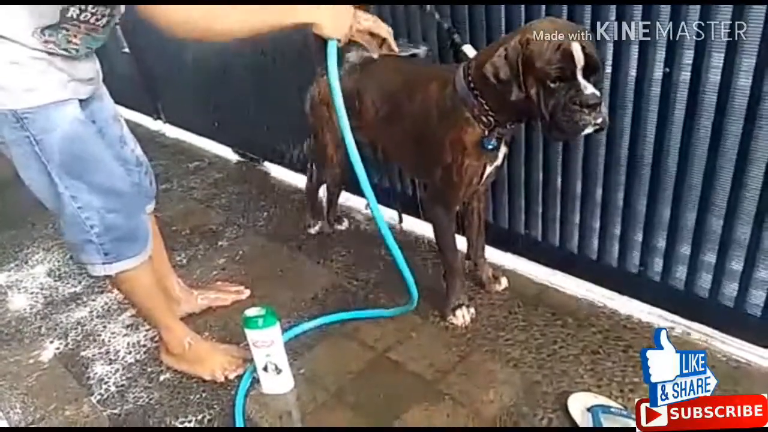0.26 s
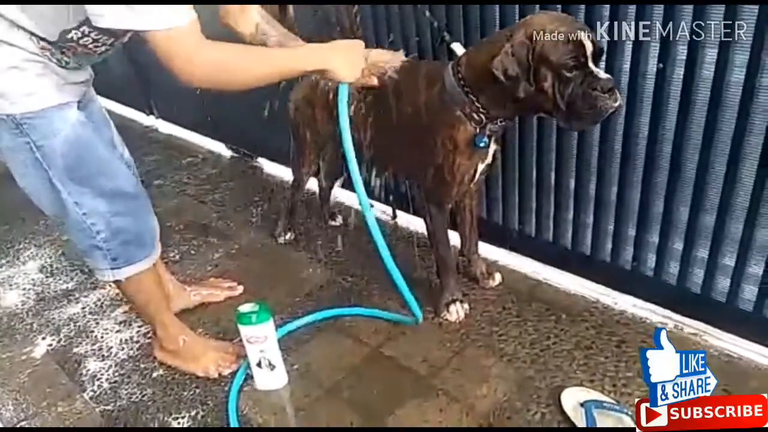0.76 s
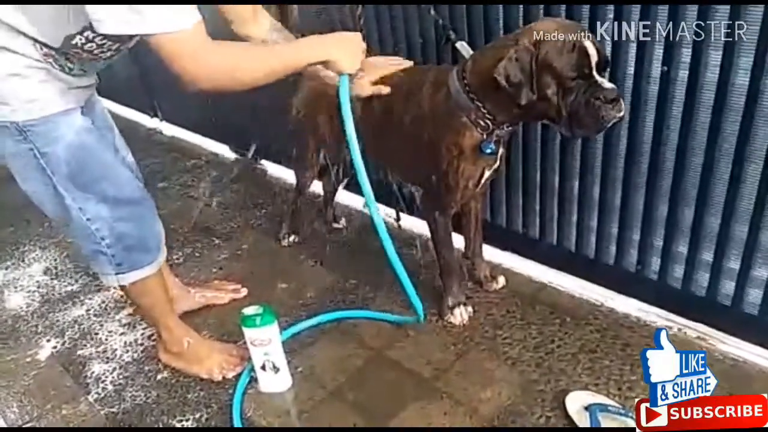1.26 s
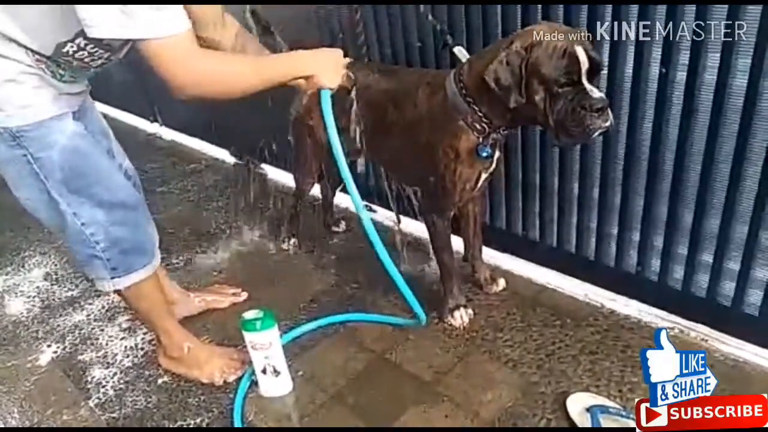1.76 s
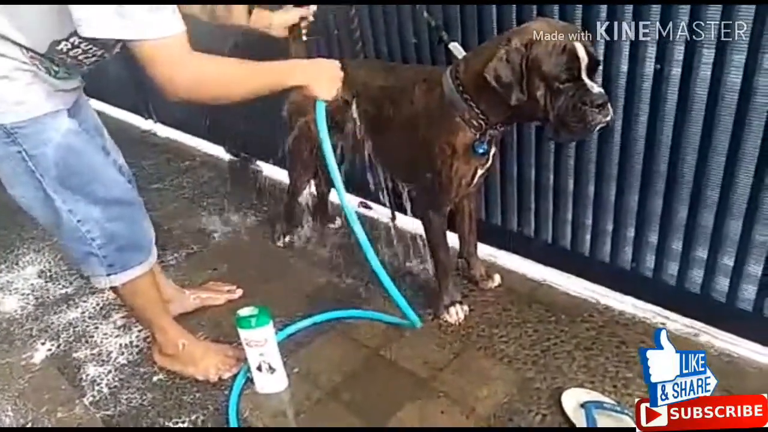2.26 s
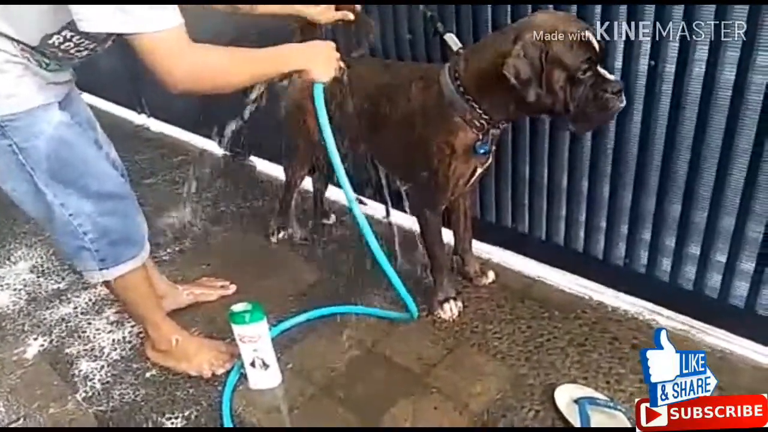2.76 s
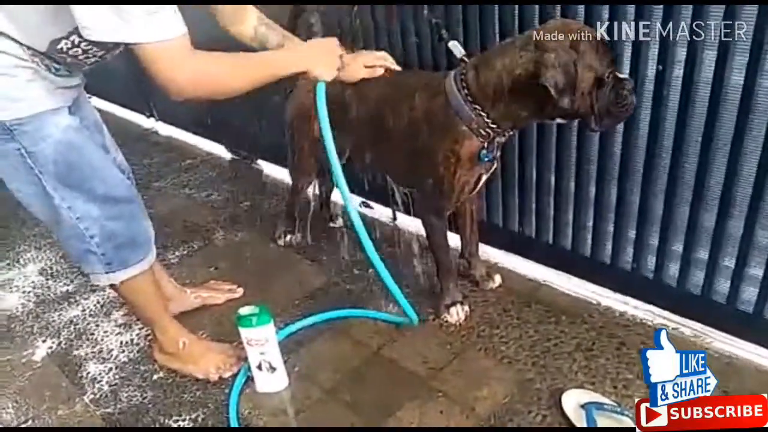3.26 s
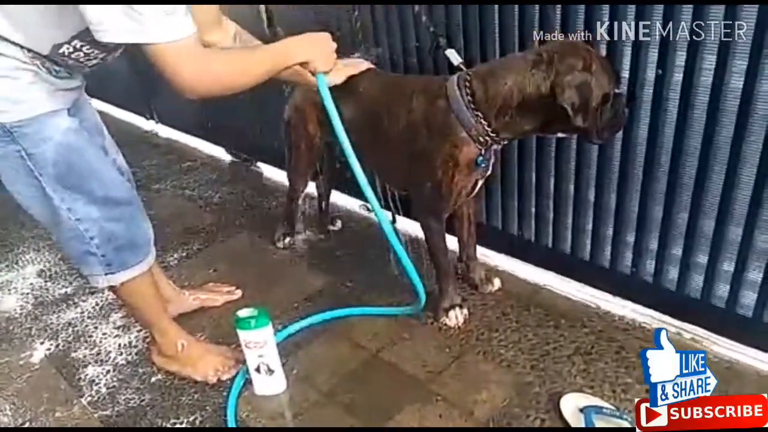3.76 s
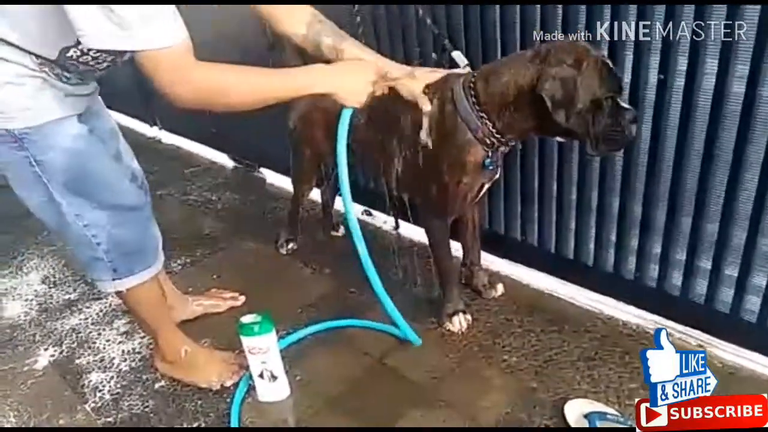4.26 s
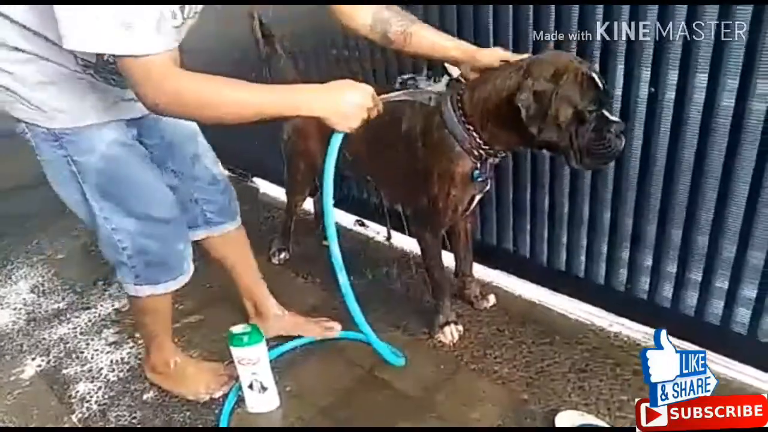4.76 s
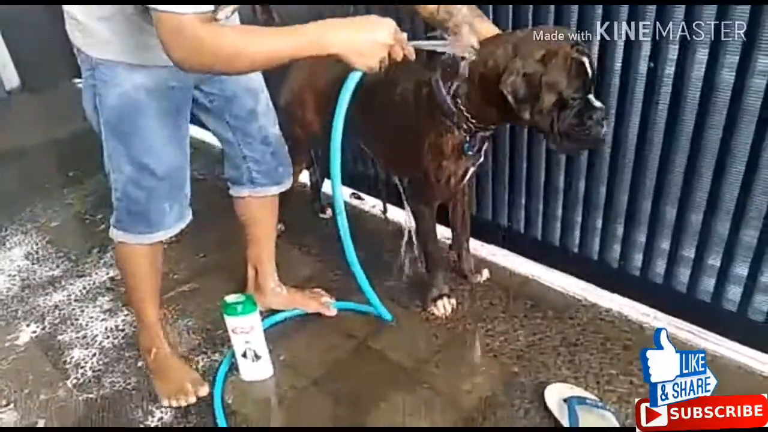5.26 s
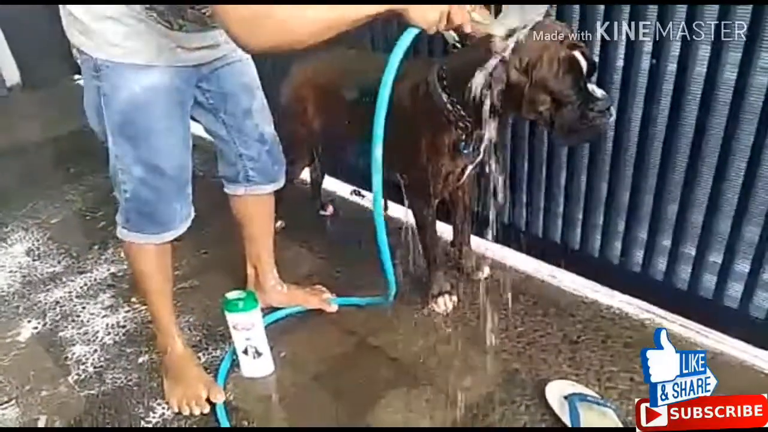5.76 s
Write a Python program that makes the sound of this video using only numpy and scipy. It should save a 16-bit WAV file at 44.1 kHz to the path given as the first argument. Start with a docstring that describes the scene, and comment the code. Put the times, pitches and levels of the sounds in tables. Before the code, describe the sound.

Close outdoor stereo sound of hose water falling from a dog's coat onto wet tiles. Irregular bright splats snap and fizz away amid fine ticking patter, busiest around two to three seconds, thinner near four, then strong again to the end. A few drops plink and puddles gurgle softly. Wind thumps the microphone early and late over a quiet distant wash.

```python
"""Water falling on wet tiles

Hose water runs off a dog's coat and falls in gobs onto wet tiles in a walled yard.
Each gob is a burst of filtered noise that smacks, then fizzes away; random ticks patter between.
Single drops ring as short sines; soft bands of noise make puddle gurgles and one moan of unknown source.
Gusts thump the microphones with resonant low noise, over a distant wash and a faint narrow-band hum."""
import sys
import numpy as np
from scipy import signal
from scipy.fft import rfft, irfft, next_fast_len
from scipy.io import wavfile
from scipy.ndimage import uniform_filter1d

SR = 44100
rng = np.random.default_rng(int(sys.argv[2]) if len(sys.argv) > 2 else 0)


def to_wav(s):
    """Save 16-bit WAV."""
    ch = np.atleast_2d(s).T  # columns
    pcm = np.round(np.clip(ch, -1, 1) * 32767)  # PCM
    wavfile.write(sys.argv[1], SR, pcm.astype(np.int16))


N = 265041

# Gobs landing. Each row: start in seconds, smack peak in dB before the high-pass, drop size (higher is
# coarser, lower mistier), nominal fizz level against the smack in dB, fizz decay time to -60 dB in seconds.
GOBS = [(0.1053, -22, 0.25, -18, 0.17), (0.2114, -19.5, -2.25, -16.5, 0.83), (0.262, -10, -1.84, -19, 0.11),
        (0.3487, -10, -1.37, -11.5, 0.37), (0.36, -19, -1.9, -34, 0.09), (0.539, -24, -3.5, -19, 0.12),
        (0.5512, -13, -2.2, -30, 0.12), (0.8238, -35.5, 0.62, -7.5, 0.64), (0.9168, -15, 0.66, -25.5, 0.14),
        (0.944, -6.5, 0.52, -22, 0.33), (1.1494, -15, -0.9, -21, 0.14), (1.2131, -23, 1.8, -14, 0.21),
        (1.5, -29.5, 0.42, -11, 1), (1.5833, -13, -0.78, -15.5, 0.25), (1.7852, -14.5, 1.25, -20, 0.36),
        (1.8479, -22, 0.58, -8.5, 1), (1.9035, -10.5, -1.3, -20, 0.15), (1.962, -15.5, 0.74, -14, 0.18),
        (2.085, -24.5, 0.86, -9, 0.12), (2.2141, -19.5, 0.19, -14, 0.087),
        (2.2372, -16.5, -0.0076, -14, 0.36), (2.2737, -17.5, 0.15, -20.5, 0.96),
        (2.401, -13.5, -0.15, -15, 0.21), (2.4212, -16, -0.28, -21, 0.1), (2.626, -21, -1.8, -28, 0.1),
        (2.662, -20.5, 6, -17.5, 0.51), (2.6722, -14.5, -1.6, -8.5, 0.26), (2.677, -10.5, -0.3, -20, 0.42),
        (2.738, -17, 0.75, -12, 0.17), (2.826, -12, -0.43, -18.5, 0.18), (2.8653, -6.5, -1.5, -26, 0.11),
        (2.905, -20, 0.55, -12, 0.33), (3.3131, -22, 0.33, -9, 0.32), (3.4224, -19.5, 2.3, -20, 0.3),
        (3.521, -20.5, 0.42, -18, 0.26), (3.6543, -30.5, 0.19, -12, 0.3), (3.868, -34, 0.77, -6, 0.46),
        (3.9182, -26.5, 0.62, -14, 0.16), (4.0454, -39.5, 2.4, -8, 0.26), (4.123, -30.5, -0.7, -13.5, 0.24),
        (4.3062, -23.5, -2.2, -25, 0.11), (4.677, -9.5, -1.74, -15, 0.15), (4.985, -10.5, -2.6, -22.5, 0.2),
        (5.066, -28.5, 0.31, -8.5, 0.1), (5.129, -12, -0.78, -14, 0.2), (5.1814, -10, -2.5, -19.5, 0.22),
        (5.3209, -19, 0.62, -13, 0.36), (5.4226, -13.5, 0.49, -11.5, 0.16), (5.4368, -5.5, -1.4, -18, 0.37),
        (5.4835, -19.5, 0.25, -17, 0.44), (5.6603, -10, -0.67, -21, 0.25), (5.7095, -9.5, -2.1, -24, 0.09),
        (5.8006, -19, 0.46, -26, 0.28), (5.8297, -16.5, 0.34, -15, 0.47), (5.846, -11.5, -1.9, -13, .1),
        (5.891, -7, -1.35, -20, 0.14), (5.9454, -20, 1.03, -10, 1)]
# Where the gobs land. Each row: time in seconds, left-right difference in dB.
SPOT = [(0, -1.5), (1.0, -1.5), (1.7, -2.5), (2.3, -5.5), (2.9, -2.7), (3.7, -1.8), (6.0, -2.3)]


def gobs():
    """Superposition: the impacts add linearly, smacks on one track and fizzes on another."""
    smacks, fizzes = np.zeros((2, N)), np.zeros((2, N))
    for s, *row in GOBS:
        pan_db = np.interp(s, *np.transpose(SPOT))
        smack, fizz = gob(pan_db, *row)
        add(smacks, s, smack)
        add(fizzes, s, fizz)
    return smacks, fizzes


# Spectrum of big drops. Each row: frequency in Hz, relative level in dB.
COARSE = [(1700, -15.5), (2500, -4.5), (3300, -2.5), (5000, -3), (7500, -14)]
# Spectrum of small drops. Each row: frequency in Hz, relative level in dB.
FINE = [(4000, -42), (5100, -5), (7000, -3), (9300, 1.5), (11500, -9.5), (14000, -96)]
# Spectrum of the finest spray. Each row: frequency in Hz, relative level in dB.
MIST = [(8000, -16.5), (11000, 16.5), (12500, 15), (14500, 11.5), (15600, 7.5)]


def gob(pan_db, peak_db, size, fizz_db, t60):
    """Impact and secondary splash: a smack of a few milliseconds, then droplets that die away."""
    t = np.arange(16384) / SR
    coarse_db, mist_db = shares(size)
    noise = rng.standard_normal((2, len(t)))
    fine = colour(noise, FINE)
    coarse = gain_of(coarse_db) * colour(noise, COARSE)
    mist = gain_of(mist_db) * colour(noise, MIST)
    sizes = np.array([fine, coarse, mist])
    peak = gain_of(peak_db + np.outer([.5, -.5], pan_db))
    sizes *= peak / np.sqrt(np.mean(sizes.sum(0) ** 2))

    attack = np.sin(np.pi / 2 * np.minimum(t / .0007, 1)) ** 2
    smack = sizes.sum(0) * np.exp(-t / .0016) * attack
    smack = smack * peak / abs(smack).max(axis=1, keepdims=True)

    # droplets thrown up land again, about 330 a second in each size
    struck = rng.random((3, len(t))) < 330 / SR
    landings = struck * np.minimum(rng.exponential(1, (3, len(t))), 2.1) ** 2
    landings = signal.lfilter([1], [1, -np.exp(-1 / (.0008 * SR))], landings)
    landings = uniform_filter1d(landings, size=12)
    spatter = np.sqrt(.5 + 2.4 * abs(landings))
    decay = gain_of(fizz_db - 60 * (t / max(t60, .02)) ** 1.444)
    taper = np.sqrt(1 - (t / t[-1]) ** 2)  # silent by the end of the buffer
    fizz = decay * np.minimum(t / 0.0053, 1) * taper
    return smack, (sizes * spatter[:, None]).sum(0) * fizz


# Big drops, then the finest spray, against small drops: dB at size 0, and dB per unit of size.
COARSE_DB, COARSE_SLOPE_DB = -20, 31
MIST_DB, MIST_SLOPE_DB = -13, -11.5


def shares(size):
    """Spectral balance by drop size: levels of big drops and of mist against small drops, in dB."""
    return COARSE_DB + COARSE_SLOPE_DB * size, MIST_DB + MIST_SLOPE_DB * size


# Run-off pattering on the tiles. Each row: time in seconds, level of the small drops in dB before
# clumping and the high-pass, drop size (higher is coarser).
PATTER = [(0, -40, 0.23), (.17, -53.5, -0.016), (.62, -36, 0.27), (.78, -56, 0.22), (.88, -41.5, -0.69),
          (1.4, -47.5, 0.24), (1.75, -45.5, -0.21), (2.55, -46, -0.054), (2.9, -38.5, 0.19),
          (3.22, -47, -0.19), (4.1, -49.5, 0.11), (4.55, -52, 0.036), (4.64, -45.5, -0.097),
          (4.88, -59, 0.22), (5.08, -43.5, -0.34), (5.78, -44.5, -0.68), (6.01, -40.5, -0.77)]
PATTER_COARSE_DB, PATTER_MIST_DB = 13.5, 8  # loose drops mix their sizes more than a gob does


def patter():
    """Random impact process: three sizes of drop follow the flow of run-off."""
    level_db, size = curves(PATTER)
    coarse_db, mist_db = shares(size)
    spread_db = 4.5
    coarse = colour(drops(290, spread_db, 0.0006, -9), COARSE)[:, :N]
    fine = colour(drops(290, spread_db, 0.0005, -16), FINE)[:, :N]
    mist = colour(drops(260, spread_db, 0.0004, -10), MIST)[:, :N]
    coarse = coarse * gain_of(coarse_db + PATTER_COARSE_DB)
    mist = mist * gain_of(mist_db + PATTER_MIST_DB)
    return gain_of(level_db) * (coarse + fine + mist)


def drops(per_s, spread_db, ring_s, wet_db):
    """Shot noise: short ticks of very uneven size, each left or right, over their own blurred echo."""
    size = next_fast_len(N)
    struck = rng.random(size) < per_s / SR
    ticks = gain_of(spread_db * np.minimum(rng.exponential(1, size), 4.2)) * struck
    ticks = ticks * gain_of(np.outer([1, -1], 2.8 * rng.standard_normal(size)))
    t = np.arange(4000) / SR
    # decay of power: the tick itself, then its echo
    fade = np.exp(-t / ring_s) + gain_of(2 * wet_db) * np.exp(-t / 0.052)
    power = signal.oaconvolve(ticks ** 2, fade[None], axes=1)
    return np.sqrt(abs(power[:, :size])) * rng.standard_normal((2, size))


def clumped(x, wide_db, narrow_db, bead_db):
    """Time-frequency modulation: patches of the spectrum swell and thin, and small spots can flash."""
    z = signal.stft(x, nperseg=256, noverlap=192)[2]
    wide, narrow, beads = rng.standard_normal((z.shape[2], z.shape[1], 3)).T
    wide = evened(uniform_filter1d(uniform_filter1d(wide, size=9, axis=0), size=30, axis=1))
    narrow = evened(uniform_filter1d(uniform_filter1d(narrow, size=2, axis=0), size=12, axis=1))
    beads = uniform_filter1d(1. * (beads > 2.9), size=6, axis=0)
    beads = uniform_filter1d(beads, size=3, axis=1) > 1e-6
    gain = gain_of(wide_db * wide + narrow_db * narrow + bead_db * beads)
    return signal.istft(z * gain, nperseg=256, noverlap=192)[1][:, :N]


# Fat single drops that ring as they land in the film of water.
# Each row: start in seconds, level in dB before the swell and fade, frequency in Hz.
BLIPS = [(0.4433, -27, 1320), (0.5939, -19, 2680), (2.8827, -18, 3230), (3.4235, -18.5, 2540),
         (4.0451, -22.5, 2790), (4.4505, -35.5, 2040), (4.578, -40, 964), (5.349, -16.5, 3520)]
BLIP_CYCLES = 3.35  # cycles to fade to about a third


def blips():
    """Superposition: each ringing drop is added at its start."""
    track = np.zeros((2, N))
    for s, *row in BLIPS:
        add(track, s, blip(*row))
    return track


def blip(db, hz):
    """Bubble resonance: a few cycles that swell and fade, in another phase at each port."""
    age = hz * np.arange(2048) / SR  # in cycles
    swell = np.sin(np.pi / 2 * np.minimum(age / 3, 1)) ** 2
    tone = np.sin(2 * np.pi * (age + rng.random((2, 1)) / 4))
    return gain_of(db) * swell * np.exp(-age / BLIP_CYCLES) * tone


# Soft bands of noise: puddle gurgles, and one soft moan of unknown source near 750 Hz.
# Each row: start in seconds, nominal level in dB, centre in Hz, length in seconds (15.8 dB of decay),
# scale of the band's width in Hz.
SOFT_BANDS = [(1.335, -56, 1160, 0.18, 760), (2.535, -62.5, 750, 0.25, 74.8), (2.923, -38, 2510, 0.11, 800),
              (3.017, -38.5, 2460, 0.14, 1850), (4.443, -49.5, 1990, 0.064, 452),
              (4.525, -56, 1580, 0.11, 600), (4.573, -58, 980, 0.059, 253), (4.677, -40, 2400, 0.042, 600)]


def soft_bands():
    """Superposition: the gurgles and the moan are each added at their start."""
    track = np.zeros((2, N))
    for s, *row in SOFT_BANDS:
        add(track, s, soft_band(*row))
    return track


def soft_band(db, hz, length, width):
    """Band-limited noise: an uneven murmur around one frequency, quick to rise and slower to fade."""
    t = np.arange(8192) / SR
    edges = [(hz - width, -35), (hz - 0.39 * width, 0), (hz + 0.5 * width, 0), (hz + 4.0 * width, -35)]
    band = colour(rng.standard_normal((2, len(t))), edges)
    flutter = evened(uniform_filter1d(rng.standard_normal(len(t)), size=200))
    band = band * gain_of(2.5 * flutter)  # the level flickers
    envelope = gain_of(db - 15.8 * (t / length) ** 2) * np.minimum(7 * t / length, 1)
    return envelope * (band + 0.11 * band[::-1])  # a little of each side leaks to the other


# Spectrum of the rough skirt. Each row: frequency in Hz, relative level in dB.
SKIRT = [(150, -12.5), (300, -2.5), (800, -14.5), (2000, -18.5)]


def low_swells():
    """Resonant noise: lumpy buffeting of gusts, and one hum swell, at a drifting pitch with a rough skirt."""
    level, hz, skirt_db = swelling()
    slow, quick = (evened(uniform_filter1d(uniform_filter1d(rng.standard_normal(N), size=k), size=k))
                   for k in (1500, 500))
    core = resonate(resonate(air(), hz, 65), hz, 68) * gain_of(0.7 * slow)
    skirt = colour(air(), SKIRT)[:, :N] * gain_of(skirt_db + 2.5 * quick)
    return level * (core + skirt)


# Gusts on the microphones, and one faint swell of the hum near 200 Hz.
# Each row: peak in seconds, level in dB before the lumps, centre frequency in Hz, half length in
# seconds, rough skirt against the resonant core in dB.
LOW_SWELLS = [(0.014, -54, 78, 0.16, -8), (0.262, -59, 100, 0.12, 19.5), (0.466, -42.5, 163, 0.18, -6),
              (0.8, -57, 87, 0.12, -18), (1.046, -57.5, 201, 0.069, -22), (3.683, -54, 102, 0.15, -12.5),
              (3.816, -54.5, 140, 0.18, 2.5), (3.93, -61.5, 63, 0.34, -2.5), (5.33, -69.5, 117, 0.23, 15.5),
              (5.705, -45.5, 100, .11, -4), (5.916, -44.5, 64.5, 0.29, -6.5)]
# Air between gusts: level in dB, buffet frequency in Hz, skirt in dB.
BREEZE = (-72, 85, 1)
SWELL_SQUARE = 2.6  # higher = flatter top, steeper ends
SWELL_EDGE_DB = -23  # drop at half a length from the peak


def swelling():
    """Amplitude-weighted mean: swells rise and die away; the strongest dominates pitch and roughness."""
    s, db, hz, half, skirt_db = np.transpose(LOW_SWELLS)
    distance = abs((np.arange(N)[:, None] / SR - s) / half)  # from the peak, in half lengths
    swell = gain_of(db + SWELL_EDGE_DB * distance ** SWELL_SQUARE)
    calm_db, calm_hz, calm_skirt_db = BREEZE
    calm = gain_of(calm_db)
    level = calm + swell.sum(1)
    pitch = (calm * calm_hz + swell @ hz) / level
    roughness = (calm * calm_skirt_db + swell @ skirt_db) / level
    return level, pitch, roughness


# The hardest thumps within the gusts. Each row: middle in seconds, level in dB, frequency in Hz.
THUMPS = [(0.46, -33, 164), (0.499, -25.5, 150), (.55, -38, 157), (5.734, -31.5, 96), (5.832, -31.5, 74.5),
          (5.88, -33.5, 65.5), (5.928, -35, 73)]
THUMP_CYCLES = 1.33  # cycles from the middle to a fade of 1/e


def thumps():
    """Superposition: each push is added around its middle."""
    track = np.zeros((2, N))
    for s, *row in THUMPS:
        add(track, s - .05, thump(*row))
    return track


def thump(db, hz):
    """Pressure pulse: one soft low push, a sine under a bell curve, the same on both ports."""
    turns = hz * (np.arange(4410) / SR - .05)
    return gain_of(db) * np.exp(-(turns / THUMP_CYCLES) ** 2) * np.sin(2 * np.pi * turns) * np.ones((2, 1))


# Spectrum of the distant wash. Each row: frequency in Hz, relative level in dB.
YARD = [(30, 4.5), (90, 3), (400, -8.5), (1500, -8), (9000, -30), (16000, -6.5)]
YARD_DB = -59.5  # level of the wash
# Hum. Each row: frequency in Hz, bandwidth in Hz, level in dB before the swell.
HUM = [(195, 7.2, -74), (365, 21, -80.5)]


def yard():
    """Ambient noise: a broadband wash and narrow-band resonances that swell and fade as a hum."""
    swell = evened(uniform_filter1d(uniform_filter1d(rng.standard_normal(N), size=6000), size=6000))
    hum = sum(gain_of(db) * resonate(air(), hz, width) for hz, width, db in HUM)
    wash = gain_of(YARD_DB) * colour(air(), YARD)[:, :N]
    return wash + hum * gain_of(2.2 * swell)


# Likeness of the two channels. Each row: frequency in Hz, left-right correlation from 0 to 1.
SAME = [(240, 0.97), (800, 0.44), (1500, 0.064)]


def air():
    """Frequency-dependent coherence: two channels of noise, alike in the bass and less so in the treble."""
    size = next_fast_len(N)
    a, b = rfft(rng.standard_normal((2, size)))
    same = np.clip(read(SAME, np.fft.rfftfreq(size, 1 / SR)), -1, 1)
    return irfft(np.array([a, same * a + np.sqrt(1 - same ** 2) * b]), size)


def resonate(x, hz, width):
    """Heterodyne resonance: shifts the curve hz down to zero, smooths, and shifts back."""
    turn = np.exp(2j * np.pi * np.cumsum(hz * np.ones(N)) / SR)
    r = np.exp(-np.pi * width / SR)
    return evened((turn * signal.lfilter([1 - r], [1, -r], x[:, :N] / turn)).real)


def colour(x, points):
    """Spectral filtering: shapes the spectrum of x and evens its level."""
    gain = gain_of(read(points, np.fft.rfftfreq(x.shape[-1], 1 / SR)))
    return evened(irfft(rfft(x) * gain, x.shape[-1]))


def read(points, hz):
    """Interpolation on a logarithmic frequency scale."""
    f, value = np.transpose(points)
    return np.interp(np.log(hz + 1), np.log(f + 1), value)


def curves(rows):
    """Linear interpolation in time: each column of a table at every sample."""
    s, *columns = np.transpose(rows)
    return [np.interp(np.arange(N) / SR, s, c) for c in columns]


def gain_of(db):
    """Decibel law: 20 dB for each factor of ten in amplitude."""
    return 10 ** (np.asarray(db) / 20)


def evened(x):
    """Normalisation to unit root-mean-square level."""
    return x / np.sqrt(np.mean(x ** 2) + 1e-20)


def add(mix, s, sound):
    """Superposition: adds a sound at s seconds, cut at the end of the mix."""
    part = mix[:, round(s * SR):][:, :sound.shape[1]]
    part += sound[:, :part.shape[1]]


def scene():
    """Linear mixing of every source, with the spray high-passed."""
    smacks, fizzes = gobs()
    water = patter() + fizzes
    # water never falls evenly
    falling = smacks + clumped(water, wide_db=2.5, narrow_db=3.5, bead_db=5)
    # a thin film on hard tiles has no low thud
    thin = signal.butter(6, 2050, "high", fs=SR, output="sos")
    spray = signal.sosfilt(thin, falling)
    low = clumped(low_swells(), wide_db=1, narrow_db=1.5, bead_db=0)
    return spray + blips() + soft_bands() + low + thumps() + yard()


# Colour of the microphone ports. Each row: frequency in Hz, left-right difference in dB.
PORTS = [(60, -0.5), (240, -1.5), (950, 1), (3770, -0.1), (8800, -1.5), (11800, 0.5), (15000, 5)]
EDGE_HZ = 15650  # upper band limit


def record(dry):
    """Transducer response: two ports differ in colour and lose the deepest bass; then the band limit."""
    size = next_fast_len(N + 2048)
    hz = np.fft.rfftfreq(size, 1 / SR)
    bass_loss = np.sqrt(1 + (55 / (hz + 1)) ** 4)
    ports = gain_of(np.outer([.5, -.5], read(PORTS, hz))) / bass_loss
    heard = irfft(rfft(dry, size) * ports, size)[:, :N]
    low_pass = signal.firwin(511, EDGE_HZ, window=("kaiser", 9), fs=SR)
    return signal.oaconvolve(heard, low_pass[None], "same")


dry = scene()
out = record(dry)
to_wav(out)
```